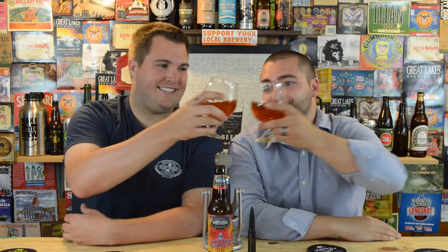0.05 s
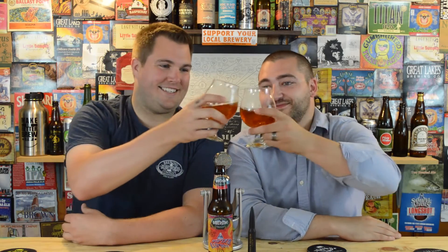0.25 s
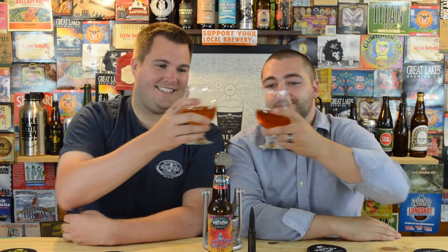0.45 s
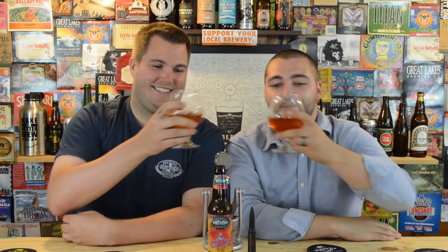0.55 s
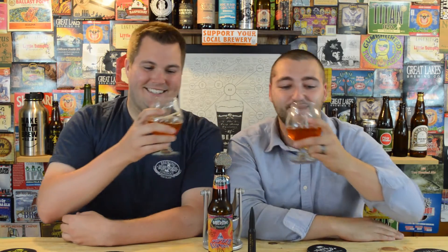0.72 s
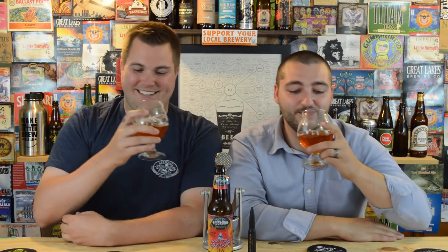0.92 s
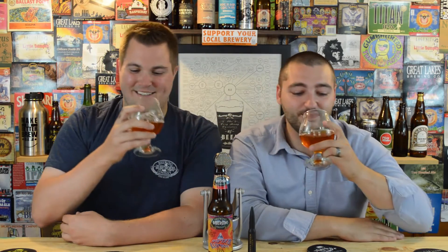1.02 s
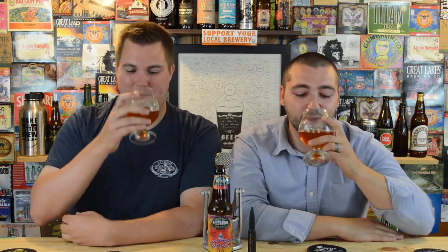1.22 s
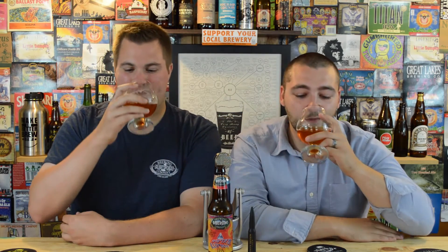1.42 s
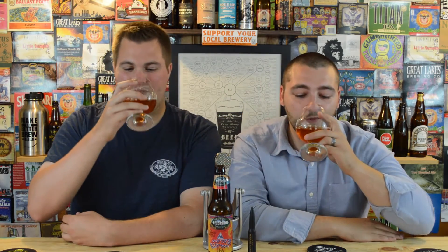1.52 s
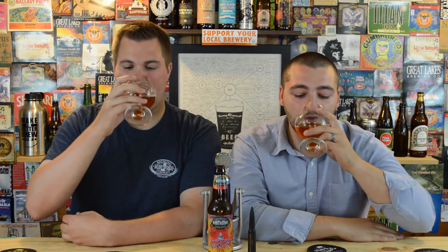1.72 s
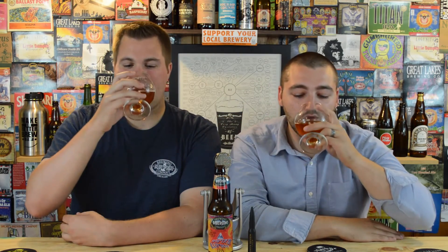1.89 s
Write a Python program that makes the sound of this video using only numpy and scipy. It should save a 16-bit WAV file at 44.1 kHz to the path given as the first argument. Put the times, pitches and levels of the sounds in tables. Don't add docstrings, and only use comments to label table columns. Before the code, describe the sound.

Two part-filled stemmed glasses clink rim to rim early on, chattering in rapid tiny contacts, then ring and fade in a small hard room; faint snaps and creaks follow over low rumble, close microphone.

```python
import sys
import numpy as np
from scipy import signal
from scipy.fft import rfft, irfft, next_fast_len
from scipy.io import wavfile
from scipy.ndimage import map_coordinates

SR = 44100
rng = np.random.default_rng(int(sys.argv[2]) if len(sys.argv) > 2 else 0)


def nominal_scale(level):
    x = np.asarray(level, float) / 20
    return 10 ** x


def transcribe(u):
    v = np.clip(np.atleast_2d(u).T, -1, 1)
    q = np.round(v * 32767).astype(np.int16)
    wavfile.write(sys.argv[1], SR, q)


N = 85995


def along(points, hz):
    point_hz, values = np.transpose(points)
    return np.interp(np.log(hz + 1), np.log(point_hz + 1), values)


def curve(rows):
    return np.interp(np.arange(N) / SR, *np.transpose(rows))


def coloured(x, points):
    size = next_fast_len(len(x) + 8192)
    gain = nominal_scale(along(points, np.fft.rfftfreq(size, 1 / SR)))
    y = irfft(rfft(x, size) * gain, size)[:len(x)]
    return y / np.sqrt(np.mean(y ** 2))


def band(size, low_hz, high_hz):
    skirts = [(low_hz / 3, -70), (low_hz * 0.7, -25), (low_hz, 0),
              (high_hz, 0), (high_hz * 1.4, -20), (high_hz * 3, -50), (high_hz * 6, -120)]
    return coloured(rng.standard_normal(size), skirts)


def add(track, start_s, x):
    part = track[max(round(start_s * SR), 0):][:len(x)]
    part += x[:len(part)]


def fade(t, t60_s):
    return nominal_scale(-60 * np.abs(t) / t60_s)


def rumble():
    # pitch_hz [Hz], level_db [dB]
    rumble_colour = [(2, 10.5), (8, 0.5), (20, -6.5), (30, -27.5), (60, -26.5), (95, -20), (150, -31.5),
                     (200, -39.5)]
    # time_s [s], level_db [dB]
    rumble_swell = [(0, -44.5), (.4, -43), (.7, -47.5), (1.05, -42), (1.3, -48), (1.6, -53.5), (1.95, -44)]
    noise = rng.standard_normal(N)
    return nominal_scale(curve(rumble_swell)) * coloured(noise, list(rumble_colour) + [(400, -60), (800, -120)])


def throb():
    # time_s [s], level_db [dB]
    throb_swell = [(0, -59), (.15, -61), (.4, -59.5), (.6, -54), (1.05, -52.5), (1.12, -69.5), (1.45, -61),
                   (1.55, -51), (1.65, -69), (1.72, -52.5), (1.8, -55), (1.95, -68)]
    throb_hz = 45
    return nominal_scale(curve(throb_swell)) * band(N, throb_hz * 0.9, throb_hz * 1.1)


def hiss():
    # pitch_hz [Hz], level_db [dB]
    hiss_colour = [(170, -11.5), (230, -2), (460, -11), (600, -21.5), (1000, -27.5), (3000, -33),
                   (14000, -37.5), (15800, -49.5)]
    level_db = -70
    return nominal_scale(level_db) * coloured(rng.standard_normal(N), [(60, -60)] + list(hiss_colour))


def hum():
    # time_s [s], level_db [dB]
    hum_swell = [(0, -79), (.9, -77), (1.25, -71), (1.5, -68.5), (1.62, -65), (1.95, -65.5)]
    hum_hz, octave_db = 227, -2.5
    t = np.arange(N) / SR
    sway = map_coordinates(rng.standard_normal(40), [t * 12])
    tone = np.sin(2 * np.pi * hum_hz * t + 0.42 * sway)
    lower_octave = nominal_scale(octave_db) * np.sin(np.pi * hum_hz * t + 0.5 * sway)
    return np.sqrt(2) * nominal_scale(curve(hum_swell) + 0.56 * sway) * (tone + lower_octave)


def cloth():
    # centre_s [s], length_s [s], level_db [dB], centre_hz [Hz]
    rustles = [
        (0.03, .3, -77, 900),
        (.17, .06, -80, 1300),
        (.665, .08, -81, 3500),
        (.755, .035, -64, 270),
        (.97, .06, -85, 3500),
        (1.96, .03, -69, 1500),
    ]
    t = np.arange(N) / SR
    out = np.zeros(N)
    for centre_s, length_s, level_db, hz in rustles:
        swell = np.exp(-(2 * (t - centre_s) / length_s) ** 2)
        out += nominal_scale(level_db) * swell * band(N, hz / 1.5, hz * 1.5)
    return out


def creaks():
    # start_s [s], level_db [dB], low_hz [Hz], high_hz [Hz], t60_ms [ms]
    ticks = [
        (.2106, -63, 1600, 3380, 3),
        (1.1115, -65, 2100, 5000, 13),
        (1.1294, -50, 2700, 5155, 9.2),
        (1.1445, -51.5, 3600, 8300, 4.5),
        (1.1538, -58, 1900, 4940, 10),
        (1.159, -59, 1890, 7300, 20),
        (1.1776, -71, 3700, 4500, 17),
        (1.5605, -63, 640, 4940, 14),
        (1.558, -71, 2870, 3100, 45),
    ]
    # start_s [s], peak_db [dB], width_ms [ms]
    snaps = [
        (.7491, -44, .035),
        (.7605, -47, .035),
        (.7679, -52, .04),
        (.7694, -51, .04),
    ]
    echo_ms, echo_db = 0.048, -4
    out = np.zeros(N)
    t = np.arange(SR // 10) / SR

    def dip(width_ms, late_ms):
        return -np.exp(-((t * 1000 - 2 * width_ms - late_ms) / width_ms * 2) ** 2)

    for start_s, peak_db, width_ms in snaps:
        add(out, start_s, nominal_scale(peak_db) * (dip(width_ms, 0) + nominal_scale(echo_db) * dip(width_ms, echo_ms)))
    for start_s, level_db, low_hz, high_hz, t60_ms in ticks:
        onset = 1 - np.exp(-t / 0.00045)
        noise = band(len(t), low_hz, high_hz)
        add(out, start_s, nominal_scale(level_db) * noise * fade(t, t60_ms / 1000) * onset)
    return out


def ring(t, contact_ms):
    bowl_hz = [1008, 1043.4, 1050, 1059.3, 1074, 1138, 2625, 2719.3, 2729.5, 2731.5, 2736.3, 5112.6, 5121,
               5129]
    rim_hz = [3967, 5366, 7047, 7774, 7812, 7862, 8770, 9740, 10280, 10340, 10620, 12560, 14300, 15420]
    # level_db [dB], t60_s [s]
    bowl_modes = [(-10.5, .15), (2, .45), (-28.5, 1.04), (-15.5, .8), (-16.5, 0.27), (-8.5, 0.15),
                  (-2, 0.033), (-27.5, .8), (-3, 0.36), (-17, 0.39), (-16.5, .5), (-23.5, .55), (-3.5, .2),
                  (-18, .65)]
    rim_modes = [(-13.5, .045), (-16, 0.13), (-22.5, .07), (-17.5, .45), (-8, 0.11), (-16.5, .18),
                 (-3, .05), (-12.5, .1), (-16.5, .35), (-14.5, 0.16), (-17.5, .2), (-10.5, 0.17),
                 (-18.5, .1), (-10.5, .1)]
    out = np.zeros(len(t))
    for hz, (level_db, t60_s) in zip(list(bowl_hz) + list(rim_hz), list(bowl_modes) + list(rim_modes)):
        softening = 1 + (hz * contact_ms / 1000) ** 2
        out += nominal_scale(level_db) * fade(t, t60_s) * np.sin(2 * np.pi * hz * t) / softening
    return out


def crack(t):
    # pitch_hz [Hz], level_db [dB]
    crack_colour = [(150, -17), (480, 5.5), (700, -9), (1900, 5.5), (2500, -14), (3700, -9), (6500, -16),
                    (11000, -14.5)]
    level_db, t60_s, onset_s = 4, 0.026, 0.00012
    noise = coloured(rng.standard_normal(len(t)), crack_colour)
    return nominal_scale(level_db) * noise * fade(t, t60_s) * (1 - np.exp(-t / onset_s))


def shove(t):
    level_db, pulse_ms = 6, 1.05
    v = t * 1000 / pulse_ms
    return nominal_scale(level_db) * v * (2.4 - v) * np.exp(-v * 0.74)


def glasses():
    contact_times = [
        0.2122,
        0.22706,
        0.24002,
        0.2598,
    ]
    # force_db [dB], contact_ms [ms], shove_db [dB]
    contact_blows = [
        (-20.5, 0.22, -1.5),
        (-28.5, .12, 6.5),
        (-25, .1, -4.5),
        (-36.5, 0.033, -6.5),
    ]
    rings, cracks, shoves = np.zeros(N), np.zeros(N), np.zeros(N)
    t = np.arange(SR) / SR
    for start_s, (force_db, contact_ms, shove_db) in zip(contact_times, contact_blows):
        since_touch = np.abs(t - (start_s * SR % 1) / SR)
        add(rings, int(start_s * SR) / SR, nominal_scale(force_db) * ring(since_touch, contact_ms))
        add(cracks, start_s, nominal_scale(force_db) * crack(t))
        add(shoves, start_s, nominal_scale(force_db + shove_db) * shove(t))
    return rings, cracks, shoves


def room(x):
    # pitch_hz [Hz], t60_s [s]
    room_fade = [(100, 0.19), (500, 0.77), (1000, 0.87), (3000, 0.7), (8000, 0.63), (15000, 0.15)]
    # pitch_hz [Hz], level_db [dB]
    room_colour = [(150, -34.5), (400, -8), (750, 7), (1900, -2.5), (3000, 2), (11000, 2), (16000, 0.5)]
    gap_s = 0.005
    hz, t, z = signal.stft(rng.standard_normal(SR), SR, nperseg=256)
    tail = signal.istft(z * fade(t, along(room_fade, hz)[:, None]), SR, nperseg=256)[1]
    late = np.zeros(N)
    add(late, gap_s, signal.fftconvolve(x, tail / np.linalg.norm(tail))[:N])
    return coloured(late, room_colour) * np.sqrt(np.mean(x ** 2))


def parting(rings):
    # time_s [s], gain_db [dB]
    facing = [
        (.34, -1.5),
        (.383, -10.5),
        (.405, 1.5),
        (.44, -1.5),
        (.47, 2.5),
        (.505, -0.5),
        (.575, -3),
        (.62, 0),
        (.75, 0.5),
    ]
    room_db = -8
    return nominal_scale(curve(facing)) * (rings + nominal_scale(room_db) * room(rings))


def scene():
    background = rumble() + throb() + hiss() + hum()
    rings, cracks, shoves = glasses()
    sharp = cracks + creaks()
    sharp_room_db = -11.5
    near = parting(rings) + sharp + shoves + nominal_scale(sharp_room_db) * room(sharp)
    return (background + cloth() + near)[None]


def band_limit(x):
    return signal.sosfilt(signal.butter(12, 16630, fs=SR, output="sos"), x)


def record(dry):
    top_hz = 16400
    heard = np.fft.rfftfreq(N, 1 / SR) < top_hz
    return band_limit(irfft(rfft(dry) * heard, N))


dry = scene()
out = record(dry)
transcribe(out)
```